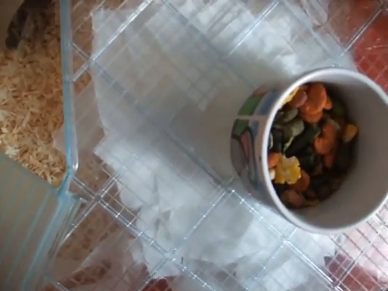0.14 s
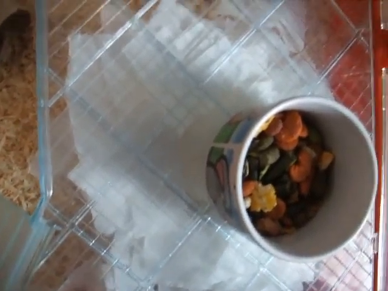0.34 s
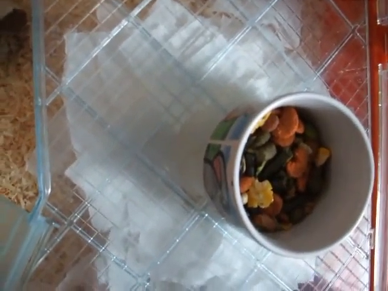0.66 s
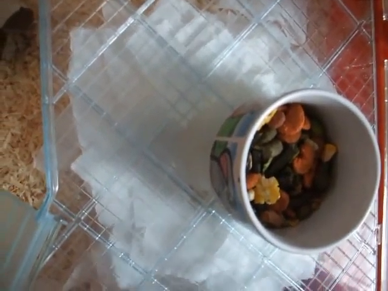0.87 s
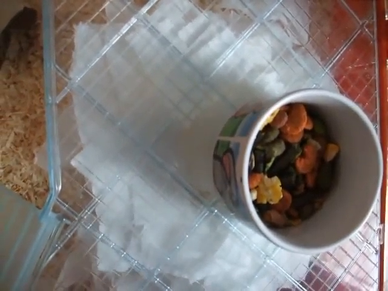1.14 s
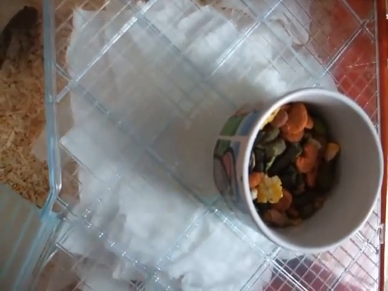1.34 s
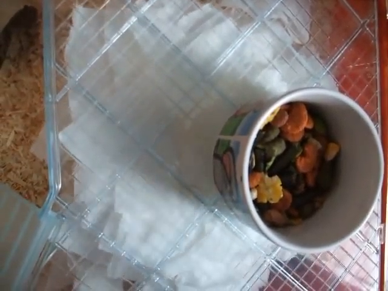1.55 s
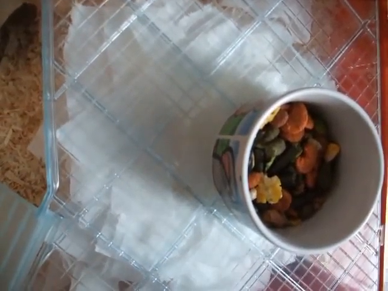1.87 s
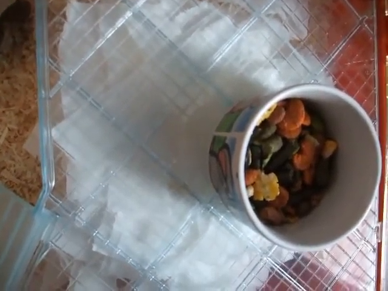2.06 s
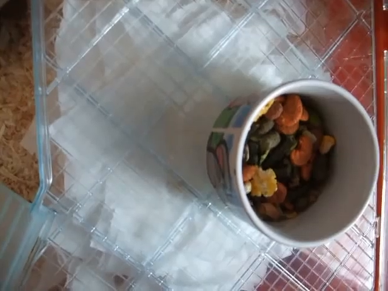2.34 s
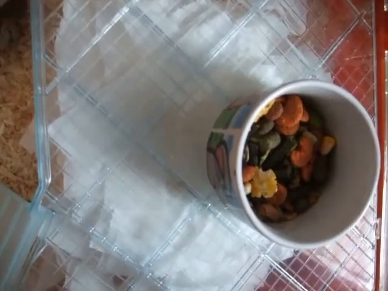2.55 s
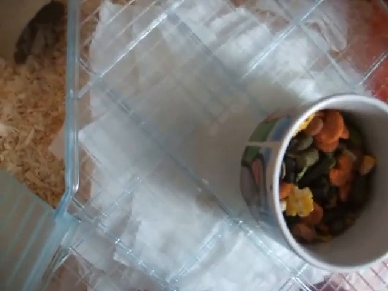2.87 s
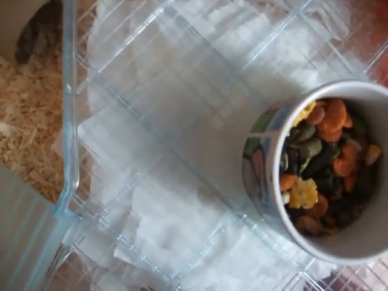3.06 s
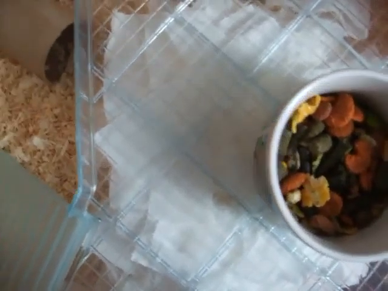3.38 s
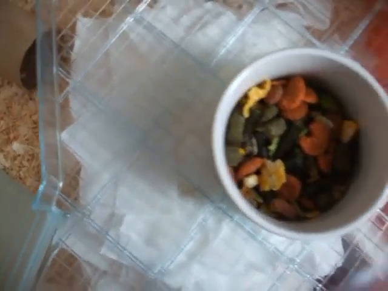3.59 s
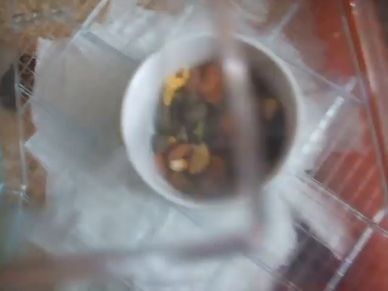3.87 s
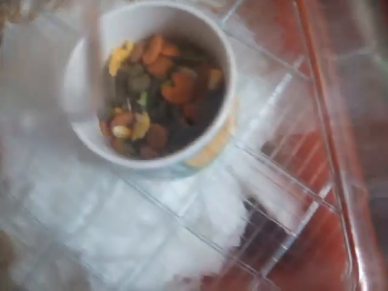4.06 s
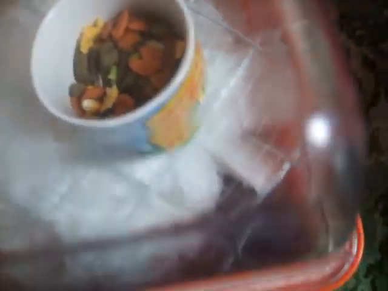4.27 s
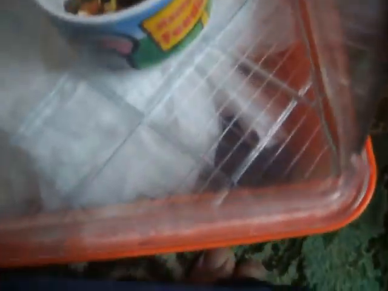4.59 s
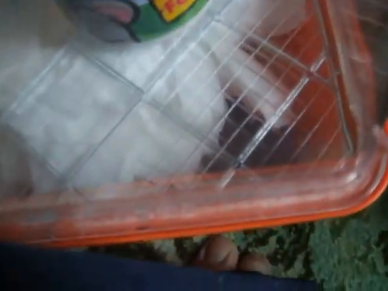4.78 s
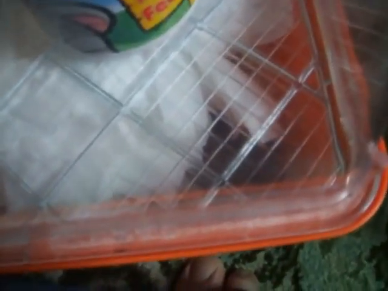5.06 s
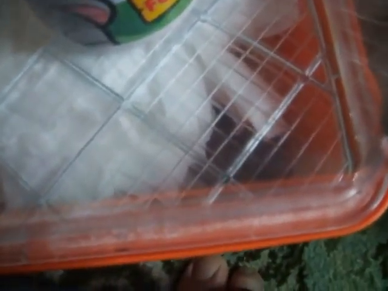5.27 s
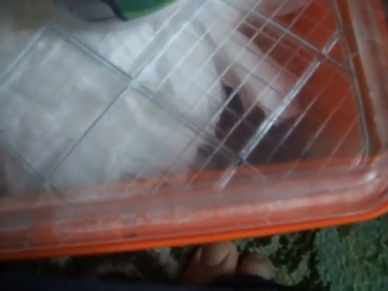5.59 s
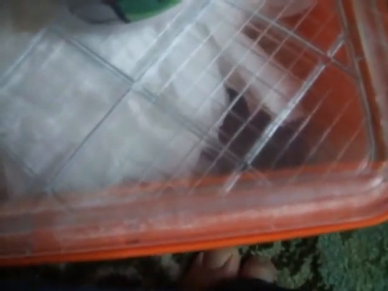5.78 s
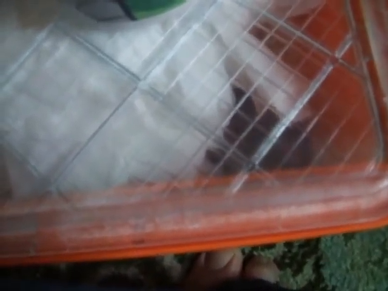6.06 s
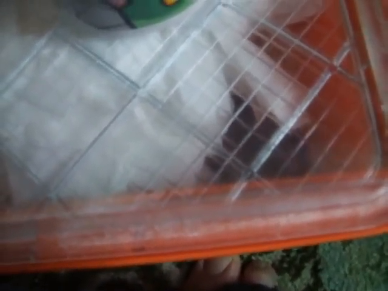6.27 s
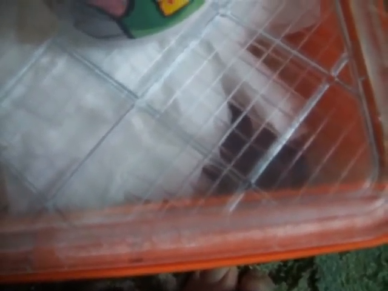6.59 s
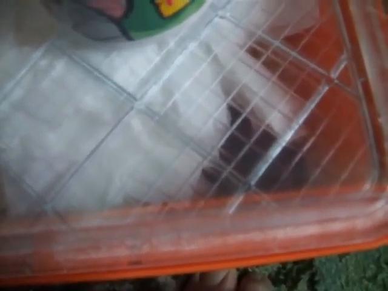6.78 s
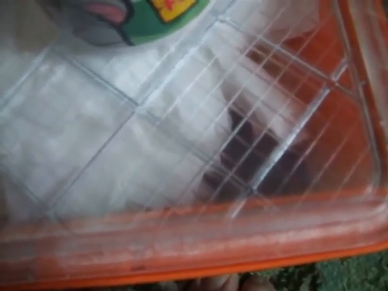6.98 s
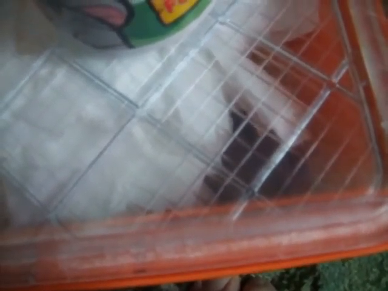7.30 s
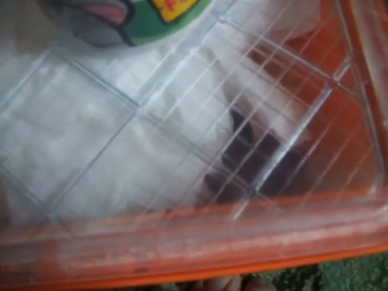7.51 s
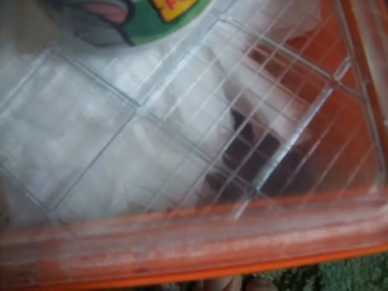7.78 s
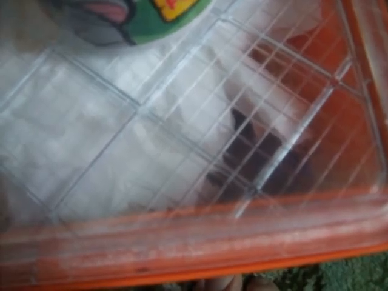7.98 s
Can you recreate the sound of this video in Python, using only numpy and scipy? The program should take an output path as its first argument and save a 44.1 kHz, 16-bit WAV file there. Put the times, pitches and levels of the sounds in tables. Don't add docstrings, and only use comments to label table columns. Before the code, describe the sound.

Coarse, low-fidelity hiss runs throughout, slightly patchy, with fluttering hollow air, low rumble and a faint high whine in a quiet room. Tiny nudges and puffs open it; light plastic clicks come near 0.9 and 1.2 seconds, the latter with a soft thump. At 2.05 a huge dull finger thump overloads, followed by low rubbing bumps, another thump at 2.6 and a snap at 2.9 amid slow drag slips. From 3.2 to 3.8 a finger judders across the shell in thudding stutters, ending in a sharp crack at 3.77 and a louder one at 3.97. Irregular cage-lid ticks run from 4.0 to 4.5, then hollow tray knocks cluster at 4.8-4.95 with a faint brush of bedding. Thumps at 5.06 and 5.5 follow; the room dulls and quiets, with small clicks near 6.2 and a last light bump and snap around 7.9-8.

```python
import sys
import numpy as np
from scipy import signal
from scipy.io import wavfile
from scipy.ndimage import uniform_filter1d

SR = 44100
rng = np.random.default_rng(int(sys.argv[2]) if len(sys.argv) > 2 else 0)


def gain_from_db(level_db):
    decades = np.asarray(level_db, float) / 20
    return 10 ** decades


def dump(signal):
    limited = np.clip(np.atleast_2d(signal).T, -1, 1)
    pcm = np.round(limited * 32767).astype(np.int16)
    wavfile.write(sys.argv[1], SR, pcm)


N = 358974
SLIP_HALF = 882


def evened(x):
    return x / np.sqrt(np.mean(x ** 2) + 1e-20)


def add(mix, s, sound):
    part = mix[round(s * SR):][:len(sound)]
    part += sound[:len(part)]


def resonate(x, hz, width):
    turn = np.exp(2j * np.pi * hz * np.arange(len(x)) / SR)
    r = np.exp(-np.pi * width / SR)
    return 2 * (turn * signal.lfilter([1 - r], [1, -r], x / turn)).real


def band(noise, hz, width):
    return evened(resonate(resonate(noise, hz, width), hz, width))


def body(x, modes):
    return sum((-1) ** k * gain_from_db(db) * resonate(x, hz, width) for k, (hz, width, db) in enumerate(modes))


def hit(db, modes, t60, noise, grit=.5, rise=0.00048):
    t = np.arange(len(noise)) / SR - rise
    swell_db = np.where(t < 0, 16 * t / rise, -60 * t / max(t60, .002))
    drive = grit * noise * gain_from_db(swell_db)
    drive[round(rise * SR)] -= 3.0
    ring = body(drive, modes)
    return gain_from_db(db) * ring / abs(ring).max()


def slip(db, hz, lean):
    def shape(u):
        even = (1 - abs(lean)) * (1 - u ** 2)
        push_pull = np.sqrt(np.e) * lean * u
        return np.exp(-u ** 2 / 2) * (even + push_pull)

    t = np.arange(-SLIP_HALF, SLIP_HALF) / SR
    u = t * hz * np.pi * np.sqrt(2)
    push = shape(u - .3 * (np.sqrt(u ** 2 + .3) - np.sqrt(.3)))
    push = push + gain_from_db(-18) * shape(1.9 * (u + 0.29))
    return gain_from_db(db) * push / abs(push).max()


def stick_slip(mix, slips, way, hz, octave_db, lean):
    for s, db in slips:
        pitch = hz * 2 ** ((db + 19.5) / octave_db)
        add(mix, s - SLIP_HALF / SR, way * slip(db, pitch, lean))


# time in seconds, openness of the hollow under the hand in dB,
# grip effort in dB.
HAND = [(0, -45, -49.5), (.3, -50.5, -55), (.4, -42.5, -58.5), (1.25, -46, -56.5), (1.38, -52, -57),
        (1.449, -47.5, -61.5), (2.561, -45.5, -58.5), (2.67, -53.5, -56.5), (2.789, -61.5, -53),
        (2.82, -44, -49), (3.152, -44, -41.5), (3.3, -47.5, -50), (3.779, -44.5, -42.5), (4.5, -49, -54),
        (5.1, -46.5, -58.5), (7.4, -46.5, -60), (7.55, -51, -60.5), (8.14, -49.5, -63)]


def hand():
    s, *controls = np.transpose(HAND)
    return [np.interp(np.arange(N) / SR, s, db) for db in controls]


# frequency in Hz, level in dB per Hz.
HISS_COLOUR = [(40, -6), (200, -3.5), (450, -0.5), (750, 3), (1300, -1.5), (1600, -1), (1900, -9.5),
               (2350, -2), (2900, -7.5), (3350, -0.5), (3800, -9), (5600, -11)]


def patchy_hiss(effort):
    level = gain_from_db(-50.5 + .12 * (effort - effort.mean()))
    frames, hz = N // 128 + 5, np.fft.rfftfreq(512, 1 / SR)
    a, b, patches = rng.standard_normal((frames, 257, 3)).T
    patches = uniform_filter1d(patches, size=6, axis=0)
    patches = evened(uniform_filter1d(patches, size=16, axis=1))
    colour_hz, colour_db = np.transpose(HISS_COLOUR)
    colour = np.interp(np.log(hz + 1), np.log(colour_hz), colour_db, right=-60)
    spectrum = (a + 1j * b) * gain_from_db(colour[:, None] + 1.5 * patches)
    hiss = signal.istft(spectrum, nperseg=512, noverlap=384)[1][:N]
    return gain_from_db(3.0) * level * evened(hiss)


# frequency in Hz, width in Hz.
HOLLOW_BANDS = [(1012.7, 150), (561.5, 70)]


def hollows(opening):
    upper = gain_from_db(2 + opening)
    lower = gain_from_db(-55 + .2 * (opening - opening.mean()))
    out = np.zeros(N)
    for level, (hz, width) in zip((upper, lower), HOLLOW_BANDS):
        breath, wobble = rng.standard_normal((2, N))
        slow = uniform_filter1d(uniform_filter1d(wobble, size=700), size=700)
        flutter = gain_from_db(3.9 * evened(slow))
        patter = gain_from_db(14.0) * breath * (abs(wobble) > 3.0)
        first = resonate(flutter * breath + patter, hz - .4 * width, .8 * width)
        out += level * evened(resonate(first, hz + .4 * width, 1.1 * width))
    return out


def grip_rumble(effort):
    low = resonate(rng.standard_normal(N), 80, 90)
    return gain_from_db(-1.0) * gain_from_db(effort) * evened(resonate(low, 110, 250))


# frequency in Hz, width in Hz, level in dB.
ROOM_BANDS = [(1361, 110, -60.5), (1607, 220, -63), (2329, 260, -58.5), (3538, 300, -63.5)]
# frequency in Hz, width in Hz, level in dB.
DRONE_BANDS = [(30.2, 40, -66), (76.3, 16, -63)]


def room_tone():
    away = gain_from_db(np.interp(np.arange(N) / SR, (5.3, 4.5), (-12, 0)))
    out = np.zeros(N)
    for level, bands in ((away, ROOM_BANDS), (1, DRONE_BANDS)):
        noise = rng.standard_normal(N)
        out += level * sum(gain_from_db(db) * band(noise, hz, width) for hz, width, db in bands)
    return out


# frequency in Hz, level in dB.
WHINE_TONES = [(1988, -67.5), (2007, -68), (3985, -70), (4005, -69)]


def whine():
    t = np.arange(N) / SR
    return sum(gain_from_db(db) * np.sqrt(2) * np.sin(2 * np.pi * (hz * t + rng.random())) for hz, db in WHINE_TONES)


# time in seconds, peak in dB, pitch in Hz.
SHELL_NUDGES = [(.01, -32, 230), (.037, -30.5, 229), (0.067, -33.5, 223), (0.088, -32, 250),
                (.098, -37, 233), (0.248, -41.5, 150), (0.329, -36, 200), (0.386, -40.5, 121),
                (1.512, -34.5, 300), (1.64, -33.5, 347), (2.148, -38, 290), (4.051, -30, 260),
                (4.301, -37.5, 170), (5.6, -42.5, 110), (5.639, -39.5, 100), (5.99, -44, 302),
                (6.123, -35, 300), (6.178, -34.5, 303), (6.217, -33.5, 304), (6.489, -38, 230),
                (6.635, -36.5, 220), (7.17, -37, 252), (7.31, -46, 200), (7.61, -37.5, 320),
                (7.798, -36.5, 80.4), (7.826, -39.5, 200), (7.877, -33.5, 377)]


def nudges(mix):
    for s, db, hz in SHELL_NUDGES:
        add(mix, s + .003 - SLIP_HALF / SR, slip(db, hz, lean=0.3))


def rub(mix, s, length, db, hz, width):
    noise = rng.standard_normal(round(length * SR))
    add(mix, s, gain_from_db(db) * band(noise, hz, width) * signal.windows.tukey(len(noise), .7))


# start in seconds, length in seconds, level in dB.
HOLLOW_SWELLS = [(0.161, 0.02, -39.5), (0.392, 0.031, -33.5), (0.501, 0.035, -39.5), (1.028, 0.036, -34),
                 (1.095, 0.019, -38.5), (1.684, 0.02, -37), (1.751, 0.015, -37.5), (1.87, 0.034, -40),
                 (2.804, 0.12, -45), (2.994, 0.014, -34), (3.686, 0.021, -36), (4.581, 0.027, -39),
                 (6.119, 0.022, -40.5), (6.21, 0.012, -35), (7.096, 0.031, -39.5)]


def swells(mix):
    for swell in HOLLOW_SWELLS:
        rub(mix, *swell, *HOLLOW_BANDS[0])


# time in seconds, peak in dB, colour in Hz.
SNAPS = [(0.4162, -30.5, 1990), (.926, -27, 3680), (1.1552, -24, 2580), (1.1598, -21, 3880),
         (2.8594, -16, 2700), (2.8755, -25, 3960), (2.894, -23.5, 4120), (3.9732, -13.5, 3270),
         (3.459, -26.5, 1440), (3.568, -28.5, 3600), (3.713, -21.5, 4770), (3.722, -27, 4900),
         (3.7345, -24, 1920), (3.7435, -21, 1680), (3.7732, -25, 2660), (4.1778, -28, 2020),
         (4.385, -26.5, 2620), (4.4, -31, 3840), (4.5928, -25, 2740), (4.730, -27, 2720),
         (4.7372, -17.5, 3150), (4.9005, -26, 2860), (4.962, -33, 3920), (4.974, -24.5, 2560),
         (5.033, -26, 3080), (5.1122, -34, 1590), (5.2, -25, 3200), (6.178, -25, 2040), (6.2171, -22, 2140),
         (7.8783, -27, 2000)]
# frequency in Hz, width in Hz, level in dB.
SHELL_MODES = [(900, 770, -14.5), (1610, 170, -6), (3460, 690, -1.5), (4930, 1200, -12.5)]


def bright_snaps(mix):
    for s, db, colour in SNAPS:
        modes = []
        for hz, width, level in SHELL_MODES:
            slope = 12.0 if hz > colour else 4.0
            modes.append((hz, width, level - slope * abs(np.log2(hz / colour))))
        modes.append((colour, 1200, 1))
        add(mix, s - .001, hit(db, modes, 0.0094, rng.standard_normal(2000), grit=1.0, rise=0.0033))


# start in seconds, length in seconds, level in dB, colour in Hz, width in Hz.
BEDDING = [
    (1.022, .064, -37, 3800, 3000),
    (3.68, .12, -45, 3000, 3000),
    (4.89, .09, -48, 3000, 3000),
    (2.89, .15, -50, 3400, 700),
    (1.69, .14, -51, 460, 80),
    (7.742, .04, -47, 1300, 90),
    (4.86, .11, -41, 500, 700),
]


def brushes(mix):
    for brush in BEDDING:
        rub(mix, *brush)


# time in seconds, peak in dB.
BACK_SLIPS = [(1.1566, -32), (1.9985, -21.5), (2.01, -21), (2.0236, -25.5), (2.0598, -21), (2.067, -25),
              (2.601, -31.5), (2.62, -26.5), (2.645, -27), (2.669, -29), (2.693, -27), (2.723, -31.5),
              (2.937, -22.5), (2.9529, -24), (2.9694, -17), (2.9822, -15.5), (2.992, -17), (3.0036, -22),
              (3.013, -26), (3.0233, -31), (3.0362, -22.5), (3.049, -20.5), (3.0596, -18), (3.0682, -28.5),
              (3.078, -36.5), (3.156, -34.5), (3.5581, -24), (3.6023, -24)]


def drag_back(mix):
    stick_slip(mix, BACK_SLIPS, -1, hz=180, octave_db=12, lean=0.052)


# time in seconds, peak in dB, colour in
# Hz.
DULL_SNAPS = [(2.053, -36.5, 1700), (2.6323, -33.5, 720), (3.225, -25, 900), (3.613, -20.5, 1520),
              (3.7621, -15.5, 1040), (3.924, -16, 1110), (3.974, -10, 1530), (5.0057, -20, 1280),
              (5.058, -28, 1280), (5.534, -18, 1360), (7.972, -25, 1490), (1.159, -24.5, 1130),
              (2.8594, -18.5, 1470), (4.739, -17.5, 1530), (3.7664, -13.5, 1720)]


def dull_snaps(mix):
    for s, db, hz in DULL_SNAPS:
        snap = hit(0, [(hz, 1100, 0)], 0.0085, rng.standard_normal(2000), grit=0.42)
        dull = resonate(resonate(snap, hz, 1.1 * hz), hz, 2.1 * hz)
        add(mix, s, gain_from_db(db) * dull / abs(dull).max())


# time in seconds, peak in dB, pitch in Hz,
# lean (0 even, 1 push-pull), way (+1 push, -1 pull).
FINGER_THUMPS = [(1.1725, -16.5, 184, -0.055, 1), (1.8371, -28.5, 361, 0.5, 1), (2.0532, 1, 401, -0.17, -1),
                 (2.445, -28.5, 89.5, .12, -1), (2.6348, -7, 226, -0.11, 1), (2.705, -29.5, 209, 0.23, 1),
                 (2.8617, -25.5, 320, 0.33, -1), (3.2243, -4, 263, -0.021, 1),
                 (3.4464, -24, 136, -0.064, 1), (3.7623, -13, 570, -.09, 1), (3.9268, -16, 330, -0.18, 1),
                 (5.006, -25.5, 323, 0.36, 1), (5.0584, -9.5, 438, 0.35, -1), (5.535, -7.5, 417, -0.12, -1),
                 (5.5778, -26, 295, 0.39, -1), (7.9719, -19.5, 557, 0.25, 1)]


def thumps(mix):
    for s, db, hz, lean, way in FINGER_THUMPS:
        add(mix, s - SLIP_HALF / SR, way * slip(db, hz, lean))


# time in seconds, peak in dB.
FORWARD_SLIPS = [(3.236, -8), (3.2507, -15.5), (3.2637, -15.5), (3.281, -15.5), (3.2985, -9),
                 (3.3089, -13.5), (3.315, -27), (3.3269, -12.5), (3.336, -25.5), (3.346, -24.5),
                 (3.352, -26), (3.5901, -15), (3.6142, -13), (3.647, -15), (3.6748, -19), (3.6944, -28),
                 (3.7083, -21), (3.7267, -20), (3.7409, -13.5), (3.7523, -21), (3.7716, -27), (3.781, -24),
                 (3.7966, -23), (3.8056, -19)]


def drag_forward(mix):
    stick_slip(mix, FORWARD_SLIPS, 1, hz=246, octave_db=20, lean=0.079)


# time in seconds, level in dB, ring in Hz, push in dB,
# push length in seconds.
SHELL_CRACKS = [
    (3.76502, 4, 3100, -25, .0012),
    (3.97401, 6.5, 4790, 0, .00045),
]


def cracks(mix):
    t = np.arange(-100, 1500) / SR
    after = np.maximum(t, 0)
    high_tone = -np.exp(-abs(t) / .00014) * np.cos(2 * np.pi * 4880 * t)
    for s, db, hz, push_db, length in SHELL_CRACKS:
        ring = -np.exp(-np.pi * 1000 * after) * np.cos(2 * np.pi * hz * t) * (t >= 0)
        u = after / length
        push = np.e * u * (np.exp(-u) - 0.02 * np.exp(-u / 3.3))
        add(mix, s - 100 / SR, gain_from_db(db) * (ring + gain_from_db(1.5) * high_tone) + gain_from_db(push_db) * push)


# time in seconds, peak in dB.
EDGE_SLIPS = [(3.9148, -26.5), (3.9313, -21), (4.0983, -29), (4.1264, -21), (4.1367, -26), (4.186, -24),
              (4.1991, -22), (4.2487, -27), (4.2581, -22), (4.2742, -28.5), (4.396, -23), (4.4077, -19.5),
              (4.4733, -28.5)]


def creep(mix):
    stick_slip(mix, EDGE_SLIPS, 0.96, hz=300, octave_db=29, lean=0.26)


def strike_spot(mix, strikes, modes, t60, rattle, fresh, grit):
    for s, db in strikes:
        noise = rattle + fresh * rng.standard_normal(3000)
        add(mix, s - .0006, hit(db, modes, t60, noise, grit))


# time in seconds, peak in dB.
LID_TICKS = [
    (4.021, -9),
    (4.078, -14.5),
    (4.111, -10),
    (4.15, -9.5),
    (4.1698, -12),
    (4.237, -15.5),
    (4.470, -15.5),
]
# frequency in Hz, width in Hz, level in dB.
LID_MODES = [(400, 270, -5), (942, 130, 6), (1776, 130, 1), (2190, 390, -11), (2950, 420, -2),
             (3840, 400, -9), (4600, 230, -15), (5470, 310, -17)]


def lid_ticks(mix, rattle):
    strike_spot(mix, LID_TICKS, LID_MODES, 0.01, rattle, fresh=0.21, grit=0.22)


# time in seconds, peak in dB.
TRAY_KNOCKS = [(4.781, -12), (4.791, -21.5), (4.801, -23), (4.807, -18.5), (4.82, -19), (4.841, -15),
               (4.855, -15.5), (4.903, -31.5), (4.915, -11.5), (4.927, -23), (4.939, -26.5), (4.948, -40),
               (4.867, -28)]
# frequency in Hz, width in Hz, level in dB.
TRAY_MODES = [(150, 49, -6.5), (225, 35, 2), (430, 73, -3.5), (588, 83, -10), (796, 43, -3.5),
              (1100, 163, -7.5), (900, 96, -10.5), (1620, 52, -7), (1774, 69, -5), (2133, 120, -12.5)]


def tray_knocks(mix, rattle):
    strike_spot(mix, TRAY_KNOCKS, TRAY_MODES, 0.038, rattle, fresh=0.79, grit=0.17)


def scene():
    opening, effort = hand()
    mix = patchy_hiss(effort) + hollows(opening) + grip_rumble(effort) + room_tone() + whine()
    for play in (nudges, swells, bright_snaps, brushes, drag_back, dull_snaps, thumps,
                 drag_forward, cracks, creep):
        play(mix)
    rattle = rng.standard_normal(3000)
    lid_ticks(mix, rattle)
    tray_knocks(mix, rattle)
    return mix[None]


def band_limit(x):
    return signal.sosfilt(signal.butter(12, 19000, fs=SR, output="sos"), x)


def record(dry):
    divide, steps = 4, 128
    soft = signal.oaconvolve(dry, signal.firwin(61, 6200, fs=SR)[None], "same")
    slow = soft[:, ::divide]
    coarse = np.clip(np.floor(slow * steps), -steps, steps - 1) / steps
    spaced = np.zeros_like(dry)
    spaced[:, ::divide] = divide * coarse
    stretch = signal.firwin(281, 5470, window=("kaiser", 9), fs=SR)
    smooth = signal.oaconvolve(spaced, stretch[None], "same")
    return band_limit(np.clip(smooth, -1, 1))


dry = scene()
out = record(dry)
dump(out)
```